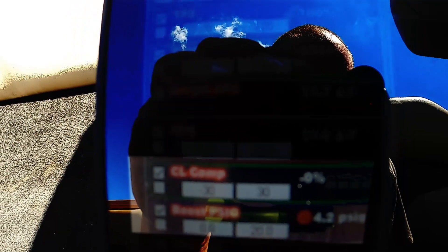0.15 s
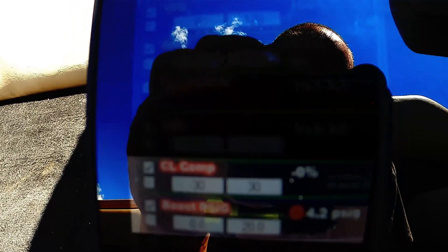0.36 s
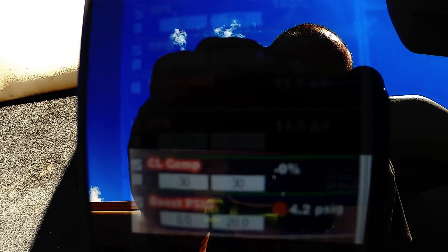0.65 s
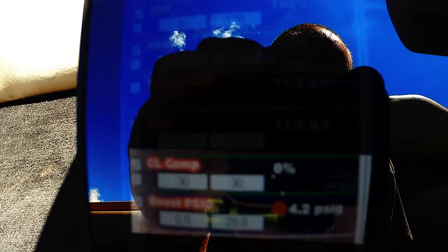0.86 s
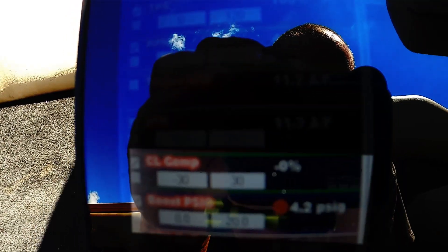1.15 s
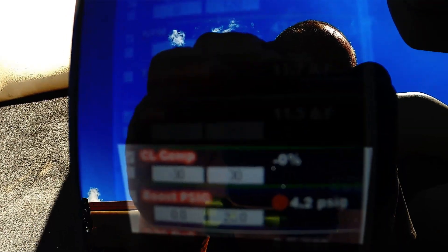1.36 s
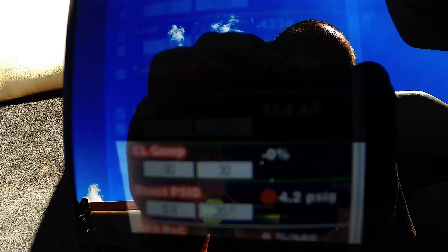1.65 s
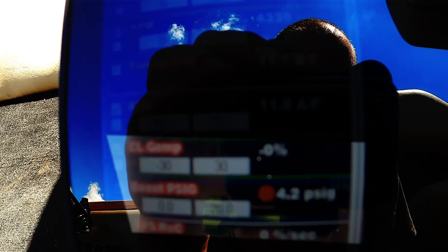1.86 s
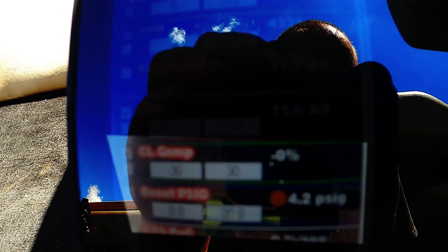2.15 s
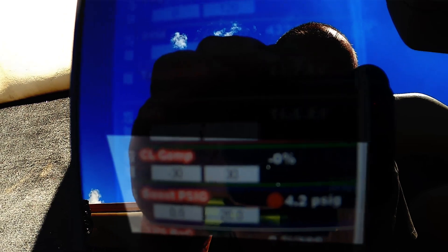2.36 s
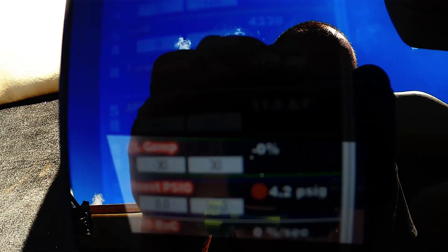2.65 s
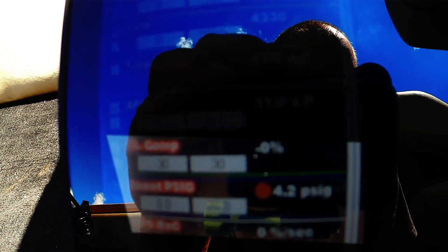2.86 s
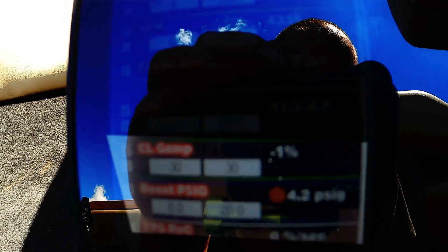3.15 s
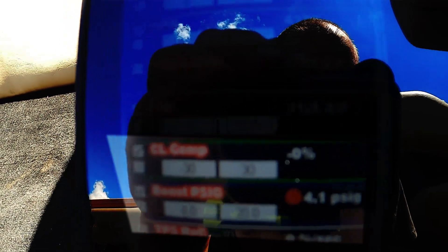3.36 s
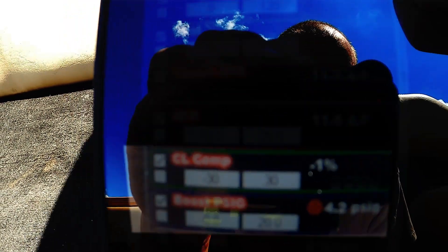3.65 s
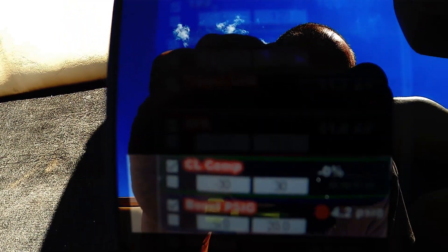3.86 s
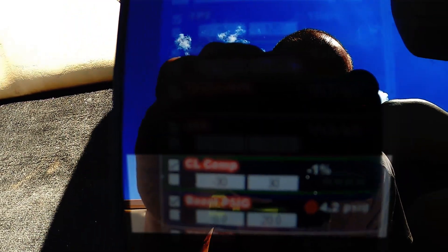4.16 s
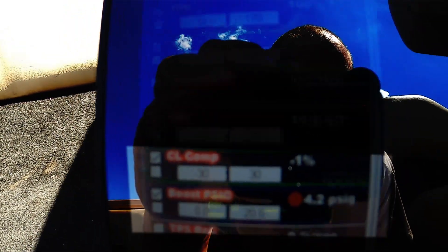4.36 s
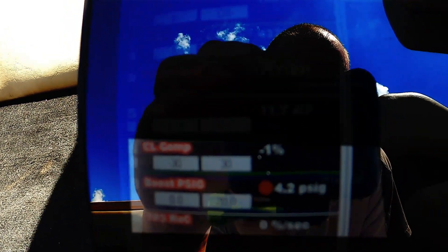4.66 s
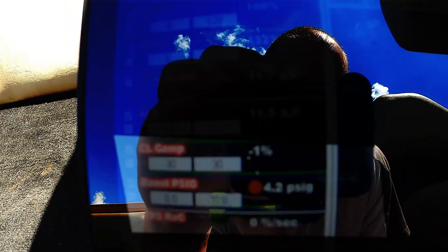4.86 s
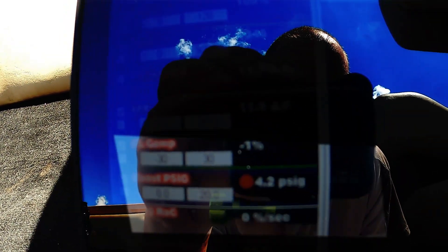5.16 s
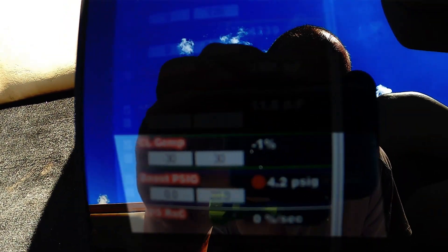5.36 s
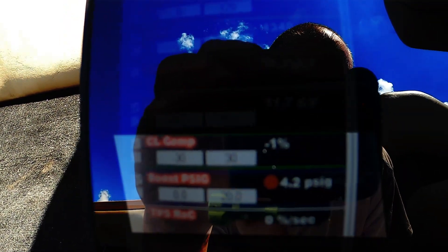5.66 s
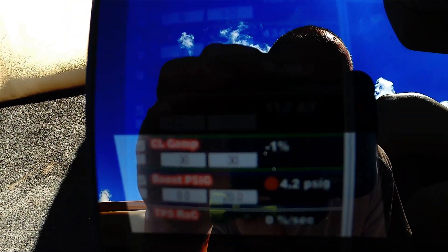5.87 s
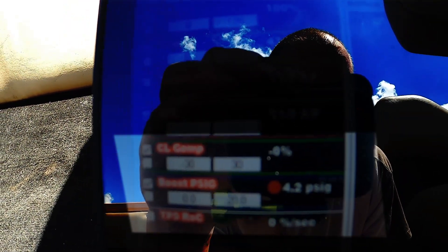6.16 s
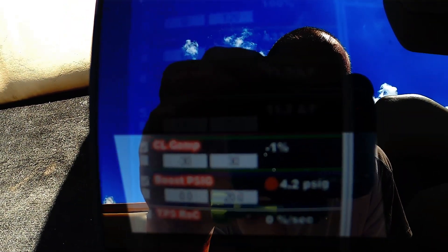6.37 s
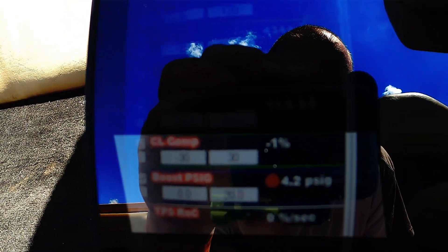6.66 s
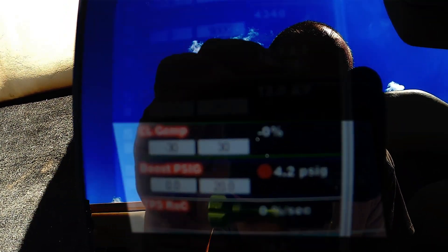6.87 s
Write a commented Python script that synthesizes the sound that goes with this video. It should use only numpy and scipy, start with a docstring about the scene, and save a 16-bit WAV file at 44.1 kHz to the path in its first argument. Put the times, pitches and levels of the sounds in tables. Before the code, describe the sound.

From the cockpit of a boat, a big engine is heard idling throughout with a low, uneven, pulsing boom. Fast metallic ticking and clacking repeats over the rumble, along with the thin, wavering whine of a supercharger. The hull hums softly under a light, even rush of engine and water noise. The microphone is close, and the level swells only slightly.

```python
"""Supercharged boat engine at idle

An eight-cylinder engine turns near 1000 rpm, heard from inside the hull. Eight uneven firings a cycle
excite the resonances of two exhaust pipes, and the block rocks on its mounts. The valve gear clacks
twice a cycle, ringing covers and hull; the blower drive whines and throbs. Steady shaking keeps covers
and hull humming, and a wash of engine and water noise fills the cockpit."""
import sys
import numpy as np
from scipy import signal
from scipy.fft import rfft, irfft, next_fast_len
from scipy.io import wavfile
from scipy.ndimage import uniform_filter1d

SR = 44100
rng = np.random.default_rng(int(sys.argv[2]) if len(sys.argv) > 2 else 0)


def int16_out(signal):
    """Quantize to a 16-bit WAV file."""
    q = np.round(np.clip(np.atleast_2d(signal).T, -1, 1) * 32767)
    wavfile.write(sys.argv[1], SR, q.astype(np.int16))


N = 309141

# Crank speed. Each row: time in seconds, speed in rpm.
CRANK_SPEED = [(0.0, 1016.8), (0.55, 996.6), (0.85, 1001.0), (1.21, 993.3), (1.61, 1012.7), (2.01, 992.9),
               (2.5, 1024.9), (2.66, 1012.2), (3.67, 1007.3), (3.9, 996.1), (4.17, 1013.5), (4.86, 1016.2),
               (5.0, 1007.2), (5.33, 1021.9), (5.84, 1008.5), (5.94, 1011.7), (6.6, 999.7), (7.01, 1002.8)]
# Cylinders in firing order. Each row: bank 0 or 1, relative header delay in ms, strength in dB,
# 1 if the cylinder burns late.
CYLINDERS = [(1, -0.21, -1.5, 0), (0, 0.72, 0.9, 0), (1, 2.37, 2.4, 1), (0, -0.42, 0.8, 0),
             (0, 1.72, -0.2, 0), (1, -2.44, 0.4, 0), (0, 0.48, 2.6, 0), (1, -1.91, 0.8, 0)]
# Lateness of the lazy cylinder's burn. Each row: time in seconds, lag in ms.
BURN_LAG = [(0.3, 3.0), (0.41, 1.25), (1.9, -0.2), (2.67, -0.1), (2.86, 1.5), (3.18, 0.5), (3.58, 2.9),
            (3.88, 0.25), (4.94, 0.1), (5.32, 2.1), (5.67, 0.5), (6.73, 0.0), (6.85, 1.0)]
# Exhaust resonances. Each row: frequency in Hz, width in Hz, signed weights from banks 0 and 1.
PIPE_MODES = [(71.7, 17.5, 0.0195, -0.0002), (88.9, 8.9, -0.025, -0.0013), (122.1, 8.9, -0.0189, 0.0071),
              (147.6, 11.7, 0.0273, 0.0322), (168.0, 17.5, -0.0134, -0.0084)]
# Slow swells of exhaust boom, firing hum, blower whine and hull drone.
# Each row: time in seconds, level in dB (only its departure from the mean counts).
BOOM_SWELL = [(0, -2), (0.9, -0.5), (2.3, -1), (2.85, 1), (3.4, -.5), (3.8, 1), (4.35, -1), (5.2, 1),
              (6.0, -.5), (6.85, 1)]
HUM_SWELL = [(0.2, -35.5), (0.6, -27.5), (1.8, -22.5), (2.6, -26.5), (3.6, -32), (4.0, -31.5), (4.4, -29.5),
             (4.9, -25), (5.3, -29.5), (6.0, -32), (6.5, -28.5), (7.01, -27)]
WHINE_SWELL = [(0, -50), (0.33, -46), (0.8, -48.5), (1.55, -44.5), (1.9, -50), (2.3, -44.5), (2.5, -48.5),
               (2.85, -44.5), (3.05, -50), (3.5, -44), (3.85, -49.5), (4.35, -44), (4.9, -49), (5.5, -45),
               (5.7, -47), (6.1, -45), (6.45, -47), (7.01, -46.5)]
DRONE_SWELL = [(0, 0), (1.0, 2.5), (2.7, -0.5), (3.0, -5), (3.9, 2), (5.85, -1), (6.2, 1.5), (7.01, 0)]
# Valve gear blows. Each row: place in the cycle from 0 to 1, then knock, ping, scrape and thud
# in relative dB.
VALVE_BLOWS = [(.13, -9, -23, -20, -8), (.255, -20.5, -7, -8.5, -11.5), (.28, -8.5, -18.5, -12, 0),
               (.322, -8.5, 0.5, -0.5, -8), (.352, -9, -12, -2, -12.5), (.378, 0.5, -11.5, -4.5, -8.5),
               (.41, -20, -17, -9.5, -3.5), (.47, -14.5, -16.5, -11, -6), (.565, -9.5, -23, -22, -14),
               (.62, -7.5, -17, -17.5, -12), (.745, -17.5, -18.5, -6.5, -14), (.795, -20, -20, -12, 0.5),
               (.84, -15.5, -7, -8.5, -6), (.865, -9.5, -11.5, -5.5, -15.5), (.9, -16.5, -15.5, -16, -16.5),
               (.94, -20.5, -21.5, -14.5, -3)]
# Low cover modes. Each row: frequency in Hz, free width in Hz, gain in dB when struck, and when shaken.
COVER_MODES = [(997, 118, -4.5, -2.5), (1087, 108, -1.5, -0.5), (1239, 36, 0.5, 2), (1520, 95, 0, 2.5),
               (1533, 95, 7, 3.5), (1720, 175, -1.5, -4), (1835, 84, -1.5, -1.5), (1920, 276, -16.5, -7.5)]
# High cover modes, excited by scraping. Each row: frequency in Hz, width in Hz, gain in dB.
SCRAPE_MODES = [(2350, 147, -1.5), (2700, 61, 3.5), (3070, 220, -3.5), (3580, 160, -2.5), (3770, 220, -3),
                (4250, 180, -7.5)]
# Modes of block and hull. Each row: frequency in Hz, free width in Hz, gain in dB.
HULL_MODES = [(299.5, 18.4, -2.5), (367.7, 39, -2), (389.4, 22, 2), (436.4, 27.3, -2), (571.6, 32, -5),
              (643, 22, -12), (770.6, 22.3, -3.5), (923, 17, -4.5)]
# Blower drive tones. Each row: periods per engine cycle, rms tremble in Hz, level in dB before modulation.
BLOWER_TONES = [(657, 29.1, -47.5), (666, 36.8, -50.5), (702, 150, -54.5), (492.4, 100, -61),
                (914, 55, -68)]
# Throb of the whine. Each row: beats per engine cycle, depth from 0 to 1, starting phase in beats.
BLOWER_THROB = [(4.871, .3, .02), (5.533, .42, .28), (5.68, .22, .84), (8, .25, .71), (13.053, .3, .49)]
# Spectrum of engine and water noise. Each row: frequency in Hz, relative density in dB.
WASH_SPECTRUM = [(20, -16.5), (32, -5.5), (45, -9.5), (100, -13.5), (160, -10.5), (200, -16.5),
                 (250, -23.5), (700, -25.5), (1500, -20), (2200, -33.5), (4100, -33), (5200, -30.5),
                 (6400, -39.5), (10000, -49), (13000, -60.5), (15500, -78.5)]
# The two microphone ports. Each row: frequency in Hz, diffuse coherence from 0 to 1,
# left minus right level in dB, phase lead of the left in radians.
PORTS = [(65, 1, .8, -.04), (160, 1, .6, -.02), (400, .98, 2.2, -.06), (850, .88, 6.5, -.05),
         (1250, .88, 5, -.13), (1600, .75, 7, -.58), (2300, .55, 4, -1.4), (3300, .45, 6, -.7),
         (4100, .55, 6, .53), (5550, .3, 4, 1.54), (7700, .2, 3.5, 1.74), (11000, .05, 3.5, 3),
         (14000, .05, 0, 3)]


def gain_of(db):
    """Amplitude ratio for a level in decibels."""
    return 10 ** (np.asarray(db) / 20)


def unit_rms(x):
    """Normalisation to an rms of 1."""
    return x / np.sqrt(np.mean(x ** 2) + 1e-20)


def swell(curve):
    """Gain of a slow level curve about its mean."""
    db = np.interp(np.arange(N) / SR, *np.transpose(curve))
    return gain_of(db - db.mean())


def slow_noise(first, second):
    """Two moving averages (lengths in samples) turn white noise into a slow wander of rms 1."""
    return unit_rms(uniform_filter1d(uniform_filter1d(rng.standard_normal(N), first), second))


def resonance(f, hz, width):
    """Response of a damped oscillator, with gain 1 at its centre."""
    return 1j * f * width / (hz ** 2 - f ** 2 + 1j * f * width)


def lowpass(f, cutoff_hz, order):
    """Zero-phase roll-off, with gain 1/2 at the cutoff."""
    return 1 / (1 + (f / cutoff_hz) ** order)


def filtered(x, response):
    """Linear filtering: the spectrum is multiplied by response(Hz)."""
    size = next_fast_len(N + SR // 2)
    return irfft(rfft(x, size) * response(np.fft.rfftfreq(size, 1 / SR)), size)[..., :N]


def ringing(x, modes, db_column=2):
    """Modal superposition: x drives every mode, and neighbours swing in opposite phase."""
    return filtered(x, lambda f: sum((-1) ** k * gain_of(row[db_column]) * resonance(f, *row[:2])
                                     for k, row in enumerate(modes)))


def impulses(times, sizes):
    """An impulse train, with times in seconds."""
    train, at = np.zeros(N), np.round(times * SR).astype(int)
    inside = (at >= 0) & (at < N)
    np.add.at(train, at[inside], sizes[inside])
    return train


def engine_cycles():
    """Phase is the integral of speed; a four-stroke cycle takes two crank turns."""
    rpm = np.interp(np.arange(N) / SR, *np.transpose(CRANK_SPEED))
    return -.0383 + np.cumsum(rpm / 120) / SR


def times_of(cycles, places):
    """Seconds at which each cycle (rows) reaches each place (columns); -1 outside the scene."""
    goal = np.arange(int(cycles[-1]) + 1)[:, None] + places
    return np.interp(goal, cycles, np.arange(N) / SR, -1, -1)


def exhaust(cycles):
    """Pipe resonance: each firing kicks the pipe of its bank; a wet muffler absorbs all above the boom."""
    bank, delay_ms, strength_db, lazy = np.transpose(CYLINDERS)
    times = times_of(cycles, np.arange(8) / 8)
    chance = rng.standard_normal(times.shape + (2,))
    jitter_ms, uneven_db = .2 * chance[..., 0], 1.5 * chance[..., 1]
    lag_ms = lazy * np.interp(times, *np.transpose(BURN_LAG))
    arrivals = times + (delay_ms + lag_ms + jitter_ms) / 1000
    sizes = gain_of(strength_db + .87 * lag_ms + uneven_db)  # a late burn leaves more pressure
    kicks = np.array([impulses(arrivals, sizes * (bank == b)) for b in range(2)])
    muffler = lambda f: lowpass(f, cutoff_hz=225, order=14) / (1 + (25 / (f + 1)) ** 4)
    pipes = lambda f: sum(np.outer(weights, resonance(f, hz, width)) for hz, width, *weights in PIPE_MODES)
    muffled = filtered(kicks, lambda f: muffler(f) * pipes(f)).sum(0)
    boom = gain_of(-19.5) * unit_rms(muffled) * swell(BOOM_SWELL)
    hum = filtered(boom, lambda f: lowpass(f, cutoff_hz=78, order=12))
    return boom - hum + hum * gain_of(-2.5) * swell(HUM_SWELL)  # the hull holds back the firing hum


def rocking(cycles):
    """Forced oscillation: the block shudders on its mounts two and three times a crank turn."""
    return gain_of(-44.5) * np.sqrt(2) * sum(np.cos(2 * np.pi * k * cycles) for k in (4, 6))


def valve_gear(cycles):
    """Impact excitation: each blow rings a knock, a ping and a scrape in the covers, a thud in the hull."""
    place, knock_db, ping_db, scrape_db, thud_db = np.transpose(VALVE_BLOWS)
    times = times_of(cycles, place)
    chance = rng.standard_normal(times.shape + (2,))
    jitter_s, uneven_db = .0003 * chance[..., 0], 1.1 * chance[..., 1]
    age = np.arange(2000) / SR
    # Contact with the striking part damps the modes and so widens them.
    damped = lambda modes: [(hz, 2.07 * width, db) for hz, width, db, *_ in modes]
    blows = 0
    for blow_db, decay_s, noise_gain, modes, level_db in (
            (knock_db, .001, .1, damped(COVER_MODES[:3]), -45.5),
            (ping_db, .001, .1, damped(COVER_MODES[3:]), -42.5),
            (scrape_db, .0018, 4., SCRAPE_MODES, -48.5),
            (thud_db, .003, .7, damped(HULL_MODES), -45.5)):
        ticks = impulses(times + jitter_s, gain_of(blow_db + uneven_db))
        bursts = signal.oaconvolve(ticks, np.exp(-age / decay_s))[:N] * rng.standard_normal((2, N))
        force = unit_rms(ticks) + noise_gain * unit_rms(bursts)
        blows += gain_of(level_db) * unit_rms(ringing(force, modes))
    return filtered(blows, lambda f: lowpass(f, cutoff_hz=6540, order=4))  # oil cushions the blows


def blower(cycles):
    """Modulation: tones geared to the crank tremble in pitch and throb with pulleys and firings."""
    throb = 1 + sum(depth * np.cos(2 * np.pi * (beats * cycles + start))
                    for beats, depth, start in BLOWER_THROB)
    whine = 0
    for periods, tremble_hz, db in BLOWER_TONES:
        drift = tremble_hz * np.cumsum(slow_noise(300, 300)) / SR
        whine += gain_of(db) * np.sqrt(2) * np.cos(2 * np.pi * (periods * cycles + drift))
    flutter_db = 1.8 * slow_noise(1500, 700)
    return whine * throb * gain_of(flutter_db) * swell(WHINE_SWELL)


def vibration():
    """Random forcing: the engine shakes covers and hull without pause, so their modes hum softly."""
    cover_shake, hull_shake = rng.standard_normal((2, 2, N))
    rattle = gain_of(-44) * unit_rms(ringing(cover_shake, COVER_MODES, db_column=3))
    drone = gain_of(-43.5) * unit_rms(ringing(hull_shake, HULL_MODES))
    return rattle + drone * swell(DRONE_SWELL)


def wash():
    """Broadband noise of engine and water, its density drifting in patches of time and frequency."""
    frames, hz = N // 256 + 5, np.fft.rfftfreq(1024, 1 / SR)
    left_re, left_im, right_re, right_im, patches = rng.standard_normal((frames, 513, 5)).T
    patch_db = 1.45 * unit_rms(uniform_filter1d(uniform_filter1d(patches, 8, axis=0), 8, axis=1))
    point_hz, point_db = np.transpose(WASH_SPECTRUM)
    density_db = np.interp(np.log(hz + 1), np.log(point_hz + 1), point_db)
    white = np.array([left_re + 1j * left_im, right_re + 1j * right_im])
    _, noise = signal.istft(white * gain_of(density_db[:, None] + patch_db), nperseg=1024, noverlap=768)
    return gain_of(-36) * unit_rms(noise[:, :N])


def ports(direct, diffuse):
    """Partial coherence: two ports share all the direct sound but only part of the diffuse field."""
    hz, coherence, left_db, lead = np.transpose(PORTS)
    at = lambda f, column: np.interp(f, hz, column)
    blend = lambda f: np.array([at(f, coherence), np.sqrt(1 - at(f, coherence) ** 2)])
    diffuse_right = filtered(diffuse, blend).sum(0)
    pair = direct + np.array([diffuse[0], diffuse_right])
    # Each side takes half the level and phase offset, in opposite senses.
    half = lambda f: gain_of(at(f, left_db) / 2) * np.exp(.5j * at(f, lead))
    return filtered(pair, lambda f: np.array([half(f), 1 / half(f)]))


def scene():
    """Superposition of all sources at the two ports."""
    cycles = engine_cycles()
    blows = valve_gear(cycles)
    direct_blows = blows.mean(0)  # the tick of a blow reaches both ports alike, its noise less so
    direct = exhaust(cycles) + rocking(cycles) + direct_blows + blower(cycles)
    diffuse = blows - direct_blows + vibration() + wash()
    return ports(direct, diffuse)


def record(dry):
    """Soft saturation flattens the loud boom in the microphone; a low-pass filter limits the band."""
    overload, edge_hz = .52, 15650
    flattened = overload * np.tanh(dry / overload)
    band_limit = signal.firwin(511, edge_hz, window=("kaiser", 9), fs=SR)
    return signal.oaconvolve(flattened, band_limit[None], "same")


dry = scene()
out = record(dry)
int16_out(out)
```